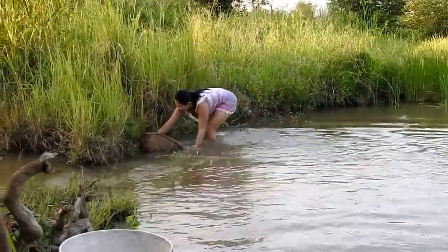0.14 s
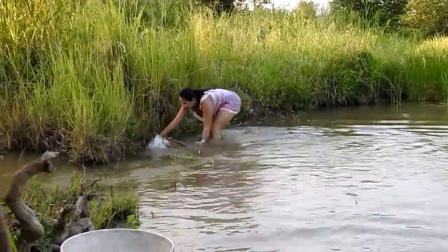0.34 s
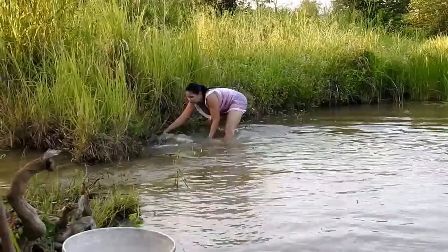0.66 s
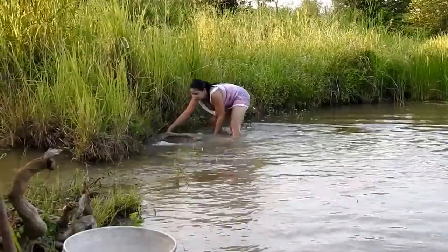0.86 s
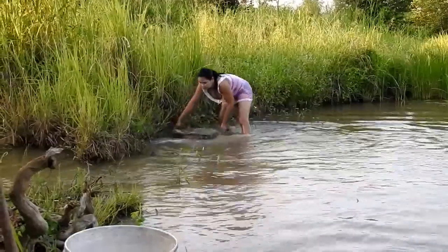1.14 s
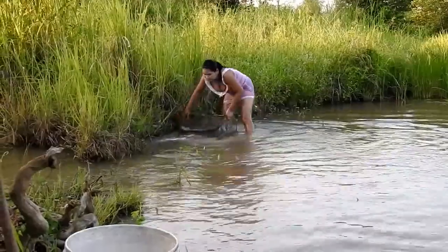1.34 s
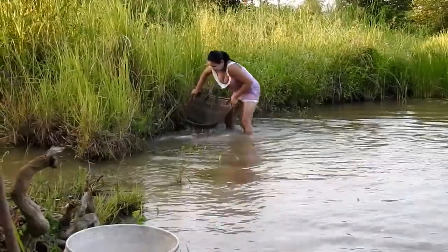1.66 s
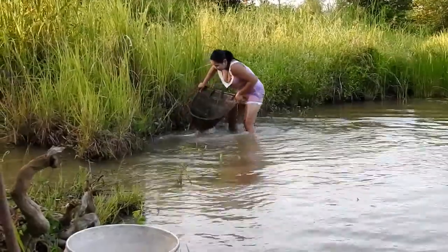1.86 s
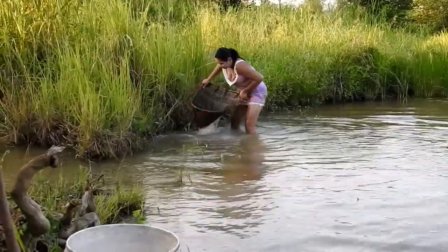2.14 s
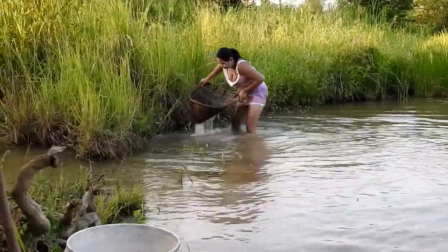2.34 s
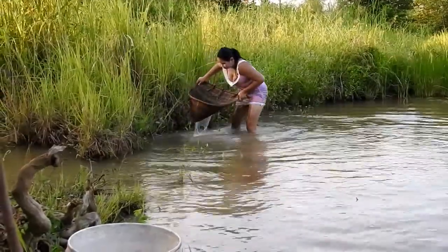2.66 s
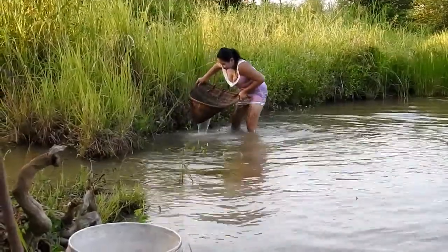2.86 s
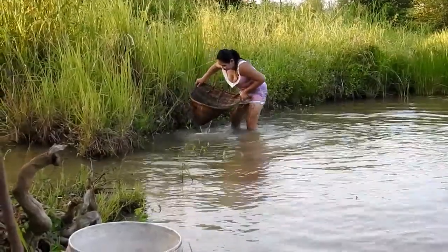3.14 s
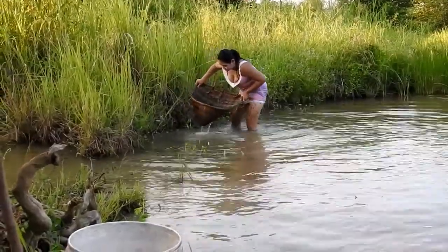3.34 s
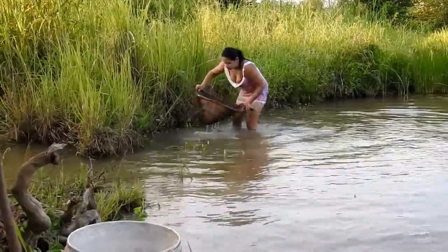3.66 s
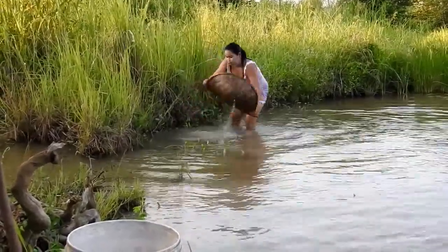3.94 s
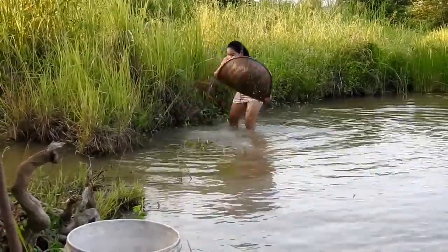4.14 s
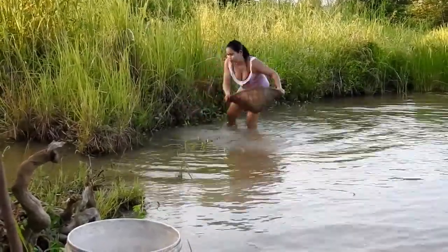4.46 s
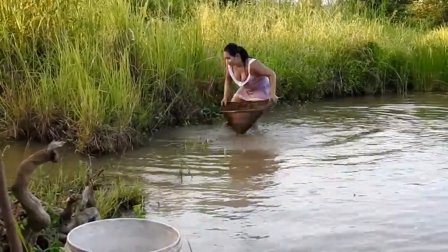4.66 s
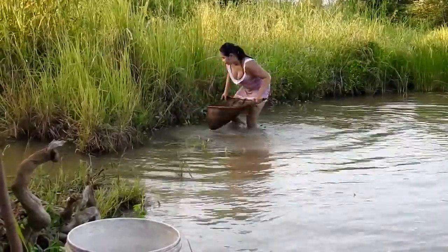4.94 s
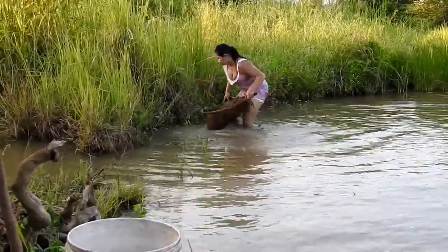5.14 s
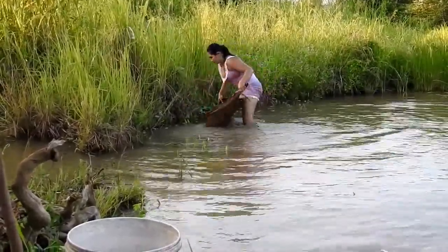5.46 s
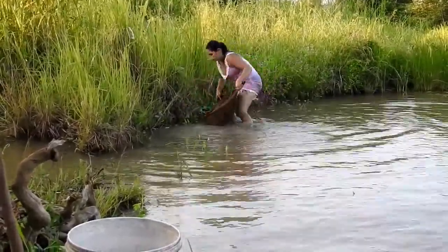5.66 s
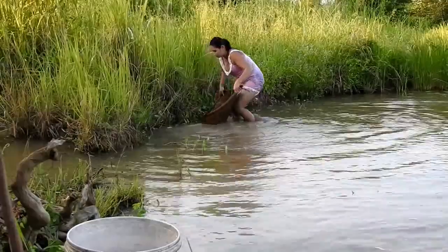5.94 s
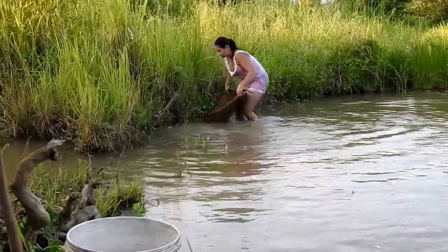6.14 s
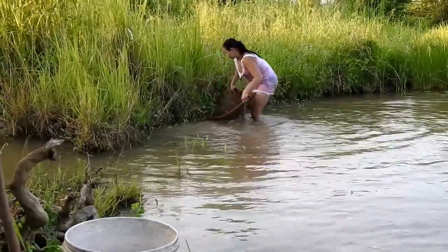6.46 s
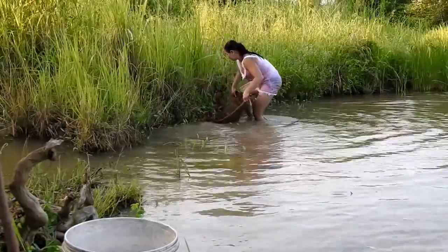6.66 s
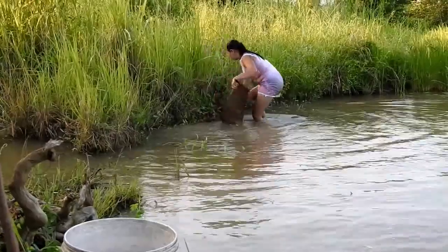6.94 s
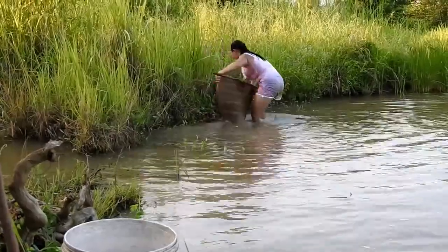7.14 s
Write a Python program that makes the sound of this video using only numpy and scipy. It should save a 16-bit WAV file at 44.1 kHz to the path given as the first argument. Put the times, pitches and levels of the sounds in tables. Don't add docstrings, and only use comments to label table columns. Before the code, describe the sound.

A steady distant one-cylinder engine thuds rapidly beside a low electrical-sounding hum, with crickets chirping and trilling. In front, someone works a basket in shallow water: a splashy push, a gulping lift, bubbly pouring and scattered drips, then a second hard dip with low thuds and sharp slaps, fading to last plinks. Short falling bird whistles appear early and midway. Open air, small camera a few metres off, slight scatter from the grassy bank.

```python
import sys
import numpy as np
from scipy import signal
from scipy.fft import rfft, irfft, next_fast_len
from scipy.io import wavfile
from scipy.ndimage import uniform_filter1d, map_coordinates

SR = 44100
rng = np.random.default_rng(int(sys.argv[2]) if len(sys.argv) > 2 else 0)


def log_audio(samples):
    frames = np.atleast_2d(samples).T
    limited = np.clip(frames, -1, 1)
    pcm = np.round(limited * 32767).astype(np.int16)
    wavfile.write(sys.argv[1], SR, pcm)


def ratio_of_db(decibels):
    return 10 ** (np.asarray(decibels, float) / 20)


N = 321930


def unit(x):
    return x / np.sqrt(np.mean(x ** 2) + 1e-20)


def along(points, hz):
    f, v = np.transpose(points)
    return np.interp(np.log(hz + 1), np.log(f + 1), v)


def curves(rows):
    s, *columns = np.transpose(rows)
    return [np.interp(np.arange(N) / SR, s, column) for column in columns]


def wobble(rate):
    coarse = np.arange(0, N + 64, 64)
    knots = rng.standard_normal(int(N * rate / SR) + 40)
    return np.interp(np.arange(N), coarse, map_coordinates(knots, [coarse * rate / SR]))


def filtered(x, response):
    m = next_fast_len(N + SR // 2)
    return irfft(rfft(x, m) * response(np.fft.rfftfreq(m, 1 / SR)), m)[..., :N]


def spread(pair, spectrum, alike):
    def mid_and_side(hz):
        turn = np.arccos(np.clip(along(alike, hz), -1, 1)) / 2
        return ratio_of_db(along(spectrum, hz)) * [np.cos(turn), np.sin(turn)]

    mid, side = filtered(pair, mid_and_side)
    return unit(np.array([mid + side, mid - side]))


def noise(patchy_db):
    z = signal.stft(rng.standard_normal((2, N)), nperseg=256)[2]
    patches = uniform_filter1d(rng.standard_normal(z.shape[1:]), size=4, axis=0)
    patches = uniform_filter1d(patches, size=8, axis=1)
    return signal.istft(z * ratio_of_db(patchy_db * unit(patches)), nperseg=256)[1][:, :N]


def bubbles(s, db, hz, cycles, rise, size):
    t = np.arange(size) / SR
    age = t * (hz / np.clip(cycles, .5, 60))[:, None]
    ring = np.sin(2 * np.pi * hz[:, None] * t * (1 + rise * np.minimum(age, 2) / 2))
    ring *= ratio_of_db(db[:, None] - 19.7 * age)
    ring *= 1 - np.exp(-t * hz[:, None] / 0.594)
    at = np.round(s * SR).astype(int)[:, None] + np.arange(size)
    return np.bincount(at.ravel(), ring.ravel(), N + size)[:N]


def swarm(hz, spread_oct, cycles, loud_db, count, size):
    crowds = []
    for draw in rng.random((2, count, 4)):
        pitch = np.clip(hz * 2 ** (spread_oct * (2 * draw[:, 1] - 1)), 100, SR / 3)
        size_db = -loud_db * np.log(draw[:, 2] + 1 / 50)
        life = cycles * (.5 + draw[:, 3])
        crowds.append(unit(bubbles(draw[:, 0] * N / SR, size_db, pitch, life, 0.1794, size)))
    return np.array(crowds)


def sweep(out, s, db, start_hz, end_hz, length, bend=1):
    u = np.linspace(0, 1, max(round(length * SR), 8))
    hz = start_hz + (end_hz - start_hz) * u ** bend
    uneven = ratio_of_db(rng.normal(0, 1, 8))[(u * 7).astype(int)]
    tone = ratio_of_db(db) * np.sin(np.pi * u ** 0.73) * uneven * np.sin(2 * np.pi * np.cumsum(hz) / SR)
    return out + np.pad(tone, (round(s * SR), N))[:N]


def grass(x, wet_db, t60=0.13):
    t = np.arange(SR // 4) / SR
    tail = rng.standard_normal((2, len(t))) * ratio_of_db(-60 * t / t60)
    tail /= np.linalg.norm(tail[0])
    return x + ratio_of_db(wet_db) * signal.fftconvolve(x[None], tail, axes=1)[:, :N]


# (f/Hz, likeness from -1 to 1)
FAR_ALIKE = [(60, 0.948), (140, 1.0), (320, 0.9423), (730, 0.73), (1680, 0.76), (3870, -0.39),
             (8910, 0.038)]
# (f/Hz, level/dB per Hz)
FIELD_HISS = [(180, -27), (300, -2.5), (406, -13), (518, -35.5), (701, -9), (922, -20), (1250, -11),
              (1460, -26.5), (1740, -20), (2280, -31.5), (4620, -26), (7650, -13.5), (8590, -28),
              (9360, -30), (12200, -66.5), (20600, -120)]
# (f/Hz, level/dB per Hz)
CHORUS = [(3000, -82.5), (6000, -22.5), (6600, -12.5), (7000, -11), (7450, 0), (7900, -5), (8120, -7.5),
          (8220, -22), (12000, -79.5)]
# (t/s, rasp level/dB, chorus level/dB)
FAR_LEVELS = [(0.0, -45, -42.5), (1.08, -50, -42.5), (1.93, -46.5, -40.5), (3.25, -52, -42.5),
              (4.11, -41.5, -42.5), (5.57, -46, -43), (5.92, -46, -42), (6.65, -52, -42.5),
              (7.3, -37, -43.5)]


def field():
    rasp_db, chorus_db = curves(FAR_LEVELS)
    rasp_colour = [(700, -92.5), (1300, -50.5), (1600, -8.0), (1750, -0.5), (1950, -10.5),
                   (2300, -11.0), (4000, -90)]
    rasp = spread(noise(patchy_db=1.0), rasp_colour, FAR_ALIKE)
    chorus = spread(noise(patchy_db=0.5), CHORUS, FAR_ALIKE)
    hiss = spread(noise(patchy_db=4.0), FIELD_HISS, FAR_ALIKE)
    return ratio_of_db(-43.5) * hiss + ratio_of_db(rasp_db - 6.5) * rasp + ratio_of_db(chorus_db + 0.71 * wobble(15)) * chorus


# (t/s, engine level/dB, hum level/dB)
LOAD = [(0.0, -28.5, -32.5), (0.41, -31, -37.5), (.62, -29, -34), (.79, -31.5, -35.5), (1, -30, -35),
        (1.44, -30, -35.5), (3.76, -32, -34), (6.34, -32, -30.5), (6.97, -33, -31.5), (7.3, -32.5, -29.5)]
# (multiple of its base pitch, level/dB)
HUM_TONES = [(1, -23), (2, 1.5), (3, -5), (4, -6), (5, -11.5), (6, -23.5)]


def humming_machine():
    hum_db = curves(LOAD)[1]
    turns = 50.286 * np.arange(N) / SR
    hum = np.zeros(N)
    for k, db in HUM_TONES:
        level = ratio_of_db(db + 0.96 * wobble(3.28))
        hum += level * np.sin(2 * np.pi * (k * turns + rng.random() + 0.042 * wobble(3.3)))
    return ratio_of_db(hum_db) * unit(hum)


# (t/s, firings per s)
ENGINE_SPEED = [(0, 14.9), (.4, 14.85), (1.2, 14.52), (1.8, 14.5), (2.4, 14.35), (3.6, 14.16), (4.4, 14.12),
                (4.9, 14.5), (5.9, 14.53), (6.4, 15.05), (7.3, 15.25)]
# (multiple of the firing rate, level/dB)
EXHAUST = [(3, -34.5), (4, -14), (5, -13), (6, -7.5), (7, -9), (8, -3.5), (9, -3), (10, -13.5), (11, 3.5),
           (12, -4), (13, -3), (14, -7.5), (15, -6), (16, -9.5), (17, -10.5), (18, -9.5), (19, -14.5),
           (20, -16.5), (21, -17.5), (22, -20.5), (23, -26.5), (24, -25)]
# (t/s, level/dB)
BOOM = [(0, 0.5), (.5, 0), (.9, -2.5), (1.3, 3), (1.9, -0.5), (2.3, 2), (2.9, 0.5), (3.3, 0.5), (3.7, -3.5),
        (4.2, -1), (4.55, -2), (5, -1.5), (5.4, -4.5), (6, -2.5), (6.5, -2), (6.9, -5.5), (7.3, 3)]
# (f/Hz, level/dB per Hz)
RUMBLE = [(13, -71), (22, -50.5), (41, -31), (69, -11), (98, -10.5), (125, -3.5), (154, -7), (208, -1),
          (500, -33), (650, -72.5), (1100, -120)]


def engine():
    engine_db = curves(LOAD)[0]
    rate, boom_db = curves(ENGINE_SPEED)[0], curves(BOOM)[0]
    turns = .43 + np.cumsum(rate * (1 + 0.0019 * wobble(6))) / SR
    exhaust = np.zeros(N)
    for k, db in EXHAUST:
        boom = boom_db * np.exp(-((k * rate - 153) / 14) ** 2)
        late = 2.2 * np.log(k) + 0.13 * wobble(3)
        exhaust += ratio_of_db(db + boom + 2.5 * wobble(4)) * np.cos(2 * np.pi * (k * turns - late))
    exhaust = unit(exhaust * ratio_of_db(1.6 * wobble(14)))
    rumble = spread(noise(patchy_db=0.5), RUMBLE, FAR_ALIKE) * ratio_of_db(1.6 * np.cos(2 * np.pi * (turns - .2)))
    opposite = ratio_of_db([[.4], [-.4]])
    return ratio_of_db(engine_db) * exhaust * opposite + ratio_of_db(engine_db - 4.0) * rumble


# (t/s, level/dB, first pulse's extra level/dB)
CHIRPS = [(.612, -39, 1.5), (1.308, -38.5, -1), (1.955, -37, 1.5), (2.629, -38.5, -1), (3.296, -37, -3.5),
          (3.975, -38, 0), (4.565, -36.5, -2), (5.259, -36.5, -1), (5.979, -39, -2), (6.666, -40, 2),
          (7.276, -38, -4)]


def near_cricket():
    near = np.zeros(N)
    for s, db, first_db in CHIRPS:
        for k in range(5):
            start = s + .039 * k + rng.normal(0, .0006)
            level = db + first_db * (k == 0) - 9 * (k == 4) + rng.normal(0, 0.54)
            near = sweep(near, start, level, start_hz=5850, end_hz=4950, length=0.023, bend=1.35)
    echo = .25 * np.roll(near, SR // 60)
    near = grass(near * ratio_of_db(1.5 * wobble(300)) + echo, wet_db=-3.5, t60=.16)
    return np.array([near[0], np.roll(near[1], 1)])


# (t/s, pulses so far)
TRILL = [(0, -.35), (4, 77.28), (7.3, 141.95)]


def high_cricket():
    beat = curves(TRILL)[0]
    hz = 8120 - 28 * (beat % 4) ** 1.6 - 90 * (beat % 1)
    stroke = np.clip((beat % 1) / .7, 0, 1)
    high = np.sin(np.pi * stroke) ** 2 * np.sin(2 * np.pi * np.cumsum(hz) / SR)
    high = ratio_of_db(-50.0 + 3.2 * wobble(8.1)) * high
    return grass(high, wet_db=-4.5) * ratio_of_db([[1.5], [-1.5]])


# (t/s, level/dB, 1 falling or -1 rising)
BIRD = [
    (.85, -47, 1),
    (1.025, -49, 1),
    (1.52, -44, 1),
    (2.822, -44, 1),
    (3.088, -57, 1),
    (3.746, -49, 1),
    (3.808, -46, -1),
    (3.82, -44.5, 1),
    (3.938, -47.5, -1),
    (4.0, -49, 1),
]


def bird():
    out = np.zeros(N)
    for s, db, way in BIRD:
        if way > 0:
            out = sweep(out, s, db, start_hz=3600, end_hz=2950, length=0.036)
        else:
            out = sweep(out, s, db, start_hz=3300, end_hz=3550, length=.018)
    return grass(out, wet_db=-7, t60=.12)


# (t/s, level/dB)
STIR = [(0, -42.5), (.8, -41.5), (1.2, -48), (1.7, -39.5), (2.15, -42.5), (2.7, -43.5), (3.3, -49),
        (4.7, -47.5), (5.5, -48), (6.2, -47.5), (6.5, -47.5), (7.3, -47)]
# (crest t/s, level/dB, spray over slosh/dB,
# time to fall 10 dB/s; a negative time builds slowly and drops fast)
SURGES = [(.03, -35, -4.5, 0.28), (0.371, -35.5, 1.5, 0.1), (.48, -36, -4.5, 0.2), (0.949, -39.5, 0, -0.3),
          (1.34, -41.5, -18, -0.6), (1.39, -46.5, -4, -0.4), (1.48, -39, -23, -1.36),
          (2.04, -44, -4.5, 0.51), (2.25, -41.5, -6.5, -0.5), (2.37, -36.5, -9, 0.0777),
          (2.459, -36, -7, 0.11), (2.53, -56, -4, 2), (2.97, -44, -4, 0.2), (3.19, -42, -15, -0.2),
          (3.86, -56.5, 1.5, 1), (3.97, -40.5, -6, 0.2), (4.782, -38.5, -2.5, 0.1),
          (5.061, -46, -1.5, 0.32), (5.369, -41, -7, 0.02), (5.8, -45.5, -16.5, 0.5),
          (5.945, -34.5, -11.5, 0.08), (6.075, -37, -7.5, 0.1458), (6.105, -53.5, -16, 0.16),
          (6.271, -41, -6, 0.1)]
# (start t/s, length/s, mist level/dB)
TRICKLES = [
    (0, 0.049, -63.5),
    (1.83, 0.196, -61),
    (2.254, .1, -69),
    (2.921, 0.132, -63),
    (4.796, 0.017, -61),
    (6.259, 0.08, -62),
]


def stirring():
    t, stir_db = np.arange(N) / SR, curves(STIR)[0]
    slosh, spray = ratio_of_db(2 * stir_db), ratio_of_db(2 * (stir_db - 6))
    for s, db, spray_db, fall in SURGES:
        rise = 0.24 * fall
        power = ratio_of_db(2 * db - 20 * np.maximum((t - s) / fall, (s - t) / rise))
        slosh = slosh + power
        spray = spray + power * ratio_of_db(2 * spray_db)
    mist = ratio_of_db(2 * -65) * (10 ** 5 * spray) ** 0.5
    for s, length, db in TRICKLES:
        inside = np.minimum(t - s, s + length - t)
        mist = mist + ratio_of_db(2 * db) * np.clip(inside / .03 + 1, 0, 1) ** 2
    return 10 * np.log10([slosh, spray, mist])


# (f/Hz, likeness from -1 to 1)
WATER_ALIKE = [(500, 0.995), (2000, 1), (5000, 0.714), (9000, 0.13), (11000, 0.1), (12500, 0.22)]
# (f/Hz, level/dB per Hz)
SLOSH = [(250, -2.5), (450, -6.5), (1000, -3), (2000, -2), (3500, -13.5), (6000, -22), (12000, -89)]
SPRAY = [(800, -61.5), (1500, -30.5), (2600, -7.5), (4000, 1), (6300, 3.5), (7600, -3), (8600, -26),
         (12000, -82.5)]
MIST = [(3000, -77.5), (6000, -20), (7500, -5), (9000, -11), (10500, -14), (12000, -20), (13500, -35.5),
        (15500, -32)]


def water():
    slosh_db, spray_db, mist_db = stirring()
    slosh = 0.9 * unit(noise(patchy_db=3.5))
    slosh += 0.25 * swarm(1401.5, spread_oct=1.286, cycles=8.9, loud_db=0.9, count=3200, size=520)
    spray = 0.67 * unit(noise(patchy_db=3.5))
    spray += 0.26 * swarm(4988, spread_oct=0.943, cycles=7.9, loud_db=3.5, count=6000, size=140)
    mist = 1.4 * unit(noise(patchy_db=-2.5))
    mist += 0.15 * swarm(9000, spread_oct=0.9, cycles=5.8, loud_db=5.0, count=4000, size=40)
    return (ratio_of_db(slosh_db - 3.5) * spread(slosh, SLOSH, WATER_ALIKE)
            + ratio_of_db(spray_db + 4) * spread(spray, SPRAY, WATER_ALIKE)
            + ratio_of_db(mist_db + 9.5) * spread(mist, MIST, WATER_ALIKE))


# (t/s, peak level/dB, f/Hz)
PLOPS = [(0.04, -28, 1104), (0.149, -26, 1850), (.263, -28.5, 1080), (.322, -31, 440), (.361, -21.5, 2650),
         (0.529, -35, 1650), (.949, -26.5, 1060), (.981, -32, 1060), (1.399, -21, 1980),
         (1.447, -26.5, 1753), (1.48, -31.5, 535.6), (1.697, -33, 1105), (1.878, -29.5, 2390),
         (2.006, -24, 2400), (2.151, -28, 1580), (2.25, -27, 1080), (2.361, -22, 2430),
         (2.395, -22.5, 2450), (2.435, -27, 1570), (2.45, -25.5, 1580), (2.495, -24.5, 1544)]
DRIPS = [(3.069, -25, 840), (3.468, -28.5, 1250), (3.683, -31, 2440), (4.111, -28.5, 1420),
         (4.157, -29, 1670), (4.183, -26, 1540), (4.329, -33, 540), (4.809, -30, 1180), (5.156, -25, 645),
         (5.168, -33, 605), (5.385, -31, 1080), (5.42, -34, 950), (5.195, -36, 1220), (5.314, -27.5, 970),
         (5.356, -23.5, 656), (5.37, -26, 1090), (5.619, -29, 1200), (5.794, -27, 1055), (5.941, -23, 1200),
         (5.947, -13.5, 1014), (5.965, -18, 1540), (6.018, -24, 1038), (6.034, -25, 1149),
         (6.099, -27, 2660), (6.102, -19.5, 1060), (6.184, -27.5, 496.4), (6.192, -27, 567),
         (6.217, -25, 830), (6.328, -28, 1550), (6.927, -22.5, 720), (7.121, -32, 681)]
GULPS = [
    (1.335, -25, 1150),
    (1.34, -23, 860),
    (2.965, -24.5, 704),
    (6.068, -26.5, 2426),
]
BLIPS = [(0.085, -25, 1240), (0.128, -33, 1250), (0.399, -26, 1150), (0.446, -28, 1610), (0.762, -29, 1640),
         (0.86, -29.5, 535), (1.187, -37, 1020), (1.559, -32, 1700), (1.599, -31, 1440), (1.778, -27, 1170),
         (1.946, -31.5, 1640), (2.231, -37, 1180), (2.353, -28.5, 1160), (2.757, -27.5, 1180),
         (3.18, -35, 1114), (3.642, -30, 1090), (3.868, -29, 1930), (4.699, -27, 1020), (4.771, -28, 1530),
         (4.927, -31, 1592), (5.081, -32, 1676), (5.455, -44, 1700), (5.709, -29, 1136), (6.066, -25, 1200),
         (6.246, -24, 694), (6.962, -34, 1700), (7.193, -32, 1770), (7.261, -42, 1740)]
PINGS = [(0.0445, -27, 5095), (0.1376, -26.5, 3790), (0.1503, -26, 3930), (0.415, -25.5, 2536),
         (0.5013, -28, 3550), (0.539, -27.5, 3970), (0.578, -36, 2474), (0.7622, -32.5, 3360),
         (1.15, -38.5, 2520), (1.3798, -29.5, 3510), (1.6641, -32, 3070), (1.9306, -32.5, 2490),
         (2.0724, -37, 2480), (2.2836, -31.5, 2380), (2.4667, -29, 2650), (2.5162, -30.5, 2420),
         (2.753, -34, 5030), (3.1927, -25, 4140), (3.643, -33, 3960), (3.6543, -40, 4940),
         (3.8192, -38, 4290), (3.8444, -32.5, 3974), (3.853, -29.5, 4530), (3.986, -32, 3790),
         (4.1211, -32.5, 4940), (5.0603, -33.5, 4520), (5.1218, -32, 2450), (5.3137, -34, 2440),
         (5.7033, -29, 2330), (5.801, -25.5, 4830), (5.943, -36, 2670), (5.9534, -29, 2690),
         (5.9763, -26, 4160), (6.1389, -41, 2400), (6.6407, -32, 3870), (6.6513, -29, 4900),
         (6.8288, -34, 2560)]


def single_bubbles():
    out = np.zeros(N)
    for table, cycles in [(PLOPS, 11), (DRIPS, 8.95), (GULPS, 22.5), (BLIPS, 6.7), (PINGS, 17.7)]:
        s, db, hz = np.transpose(table)
        db = db - 1.5 * np.exp(-((hz - 2440) / 280) ** 2)
        out += bubbles(s, db - 3.5, hz * 0.958, cycles, rise=0.11, size=1800)
    return out * ratio_of_db(3 * wobble(320))


# (t/s, peak level/dB, centre f/Hz)
SPLATS = [(.1494, -29, 6565), (.358, -31.5, 6000), (0.5416, -15, 6580), (0.765, -24.5, 6900),
          (0.9559, -18, 5233), (1.373, -20, 7440), (1.409, -18.5, 6630), (1.4197, -25, 6550),
          (1.573, -21.5, 5486), (1.5993, -23, 7510), (2.353, -28, 6566), (2.9285, -18, 6260),
          (3.128, -34, 5560), (3.19, -20.5, 4330), (3.49, -24, 5145), (3.65, -25, 5370), (3.967, -22, 6440),
          (4.1914, -20, 5630), (4.262, -19.5, 5250), (4.288, -20.5, 4476), (4.333, -22, 6000),
          (4.778, -16.5, 6600), (4.785, -19.5, 6400), (4.796, -21.5, 6470), (4.81, -24.5, 5440),
          (5.065, -20, 5760), (5.8116, -18, 5400), (5.975, -21, 4550), (6.1027, -22, 5370),
          (6.4094, -24, 7370), (.044, -23, 3000), (.138, -22, 3400), (.046, -14, 480), (.72, -20.5, 476),
          (.93, -21, 520), (5.976, -20, 560), (6.078, -20, 400), (6.102, -12.5, 480), (6.125, -20, 800),
          (6.142, -19, 400), (6.38, -21.5, 480)]
# (t/s, peak level/dB)
SMACKS = [(0.047, -8), (0.951, -18), (.98, -12), (1.336, -21), (1.346, -19), (2.251, -14), (3.181, -21),
          (4.773, -28), (5.157, -16), (5.198, -17), (5.313, -21), (5.371, -15), (5.703, -21.5),
          (5.734, -15), (5.964, -19), (6.102, -9)]


def slaps():
    out = np.zeros(N)
    t = np.arange(SR // 8) / SR
    f = np.fft.rfftfreq(len(t), 1 / SR)
    sharp = [(s, db, hz, 0.038) for s, db, hz in SPLATS]
    dull = [(s, db, 1200, 0.014) for s, db in SMACKS]
    for s, db, hz, t60 in sharp + dull:
        colour_db = -24 * np.log2((f + 1) / hz) ** 2 - 20 * (f > 8300) - 20 * (f > 12000)
        burst = unit(irfft(rfft(rng.standard_normal(len(t))) * ratio_of_db(colour_db), len(t)))
        shape = ratio_of_db(db - 10 - 60 * t / t60) * (1 - np.exp(-t / 0.0015))
        out[round(s * SR):][:len(t)] += shape * burst
    return out


# (t/s, peak level/dB, f/Hz)
SLAMS = [
    (0.044, -21.5, 260),
    (5.966, -20, 230),
    (6.079, -16, 231),
    (6.104, -15.5, 240),
    (6.172, -24, 302),
]


def rim_slams():
    s, db, hz = np.transpose(SLAMS)
    return bubbles(s, db, hz, cycles=5, rise=-.1, size=2600)


def splashes():
    return grass(single_bubbles() + slaps() + rim_slams(), wet_db=-12, t60=.11)


# (f/Hz, width/Hz, level/dB)
ECHO_COLOUR = [(540, 70, 6), (681, 106, -6), (1180, 150, 4.5), (1420, 45, 1.5), (1605.4, 112, 6),
               (2277, 55.2, -19.5), (2440, 274, 6), (3500, 180, 0.5), (3747, 120, -5.5), (4560, 32, -4),
               (4734, 65, -4.5), (6070, 140, 5), (6063, 89, -6.5), (6580, 225, 6.5), (7150, 120, 0.5)]


def basket_in_pond():
    def echoes(f):
        return ratio_of_db(sum(db * np.exp(-((f - hz) / width) ** 2) for hz, width, db in ECHO_COLOUR))

    return filtered(water() + splashes(), echoes)


def scene():
    background = field() + humming_machine() + engine()
    return background + near_cricket() + high_cricket() + bird() + basket_in_pond()


def roll_off(x):
    return signal.sosfilt(signal.butter(12, 15300, fs=SR, output="sos"), x)


def record(dry):
    def casing(f):
        return 1 + .5 * np.exp(-((f - 3850) / 250) ** 2 - 2j * np.pi * f * .0101)

    fade = np.minimum(np.arange(N)[::-1] / 500, 1)
    return roll_off(fade * filtered(dry, casing))


dry = scene()
out = record(dry)
log_audio(out)
```